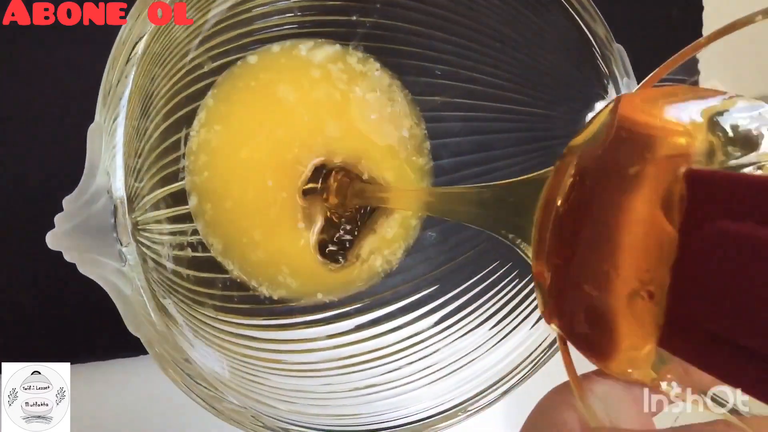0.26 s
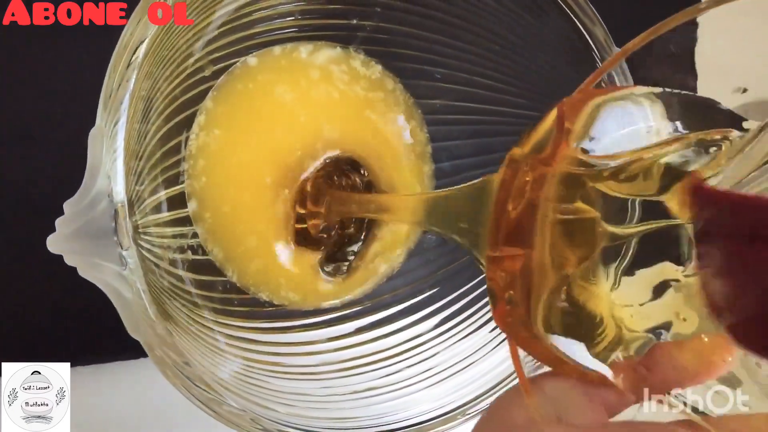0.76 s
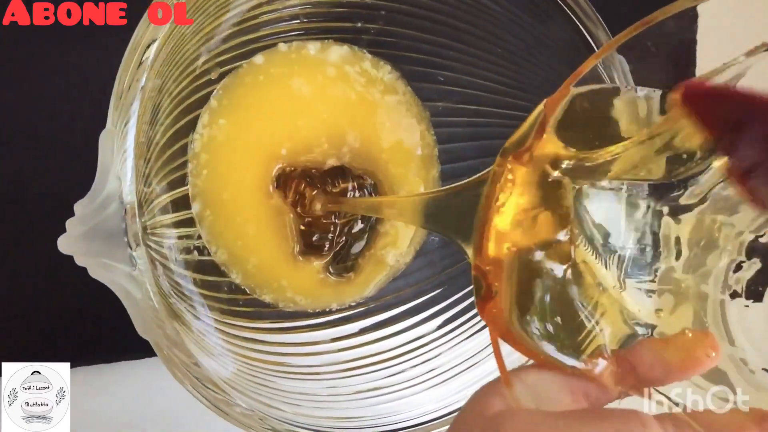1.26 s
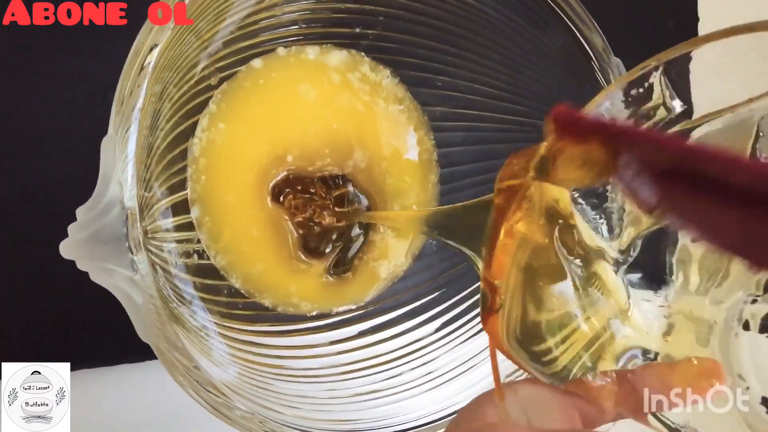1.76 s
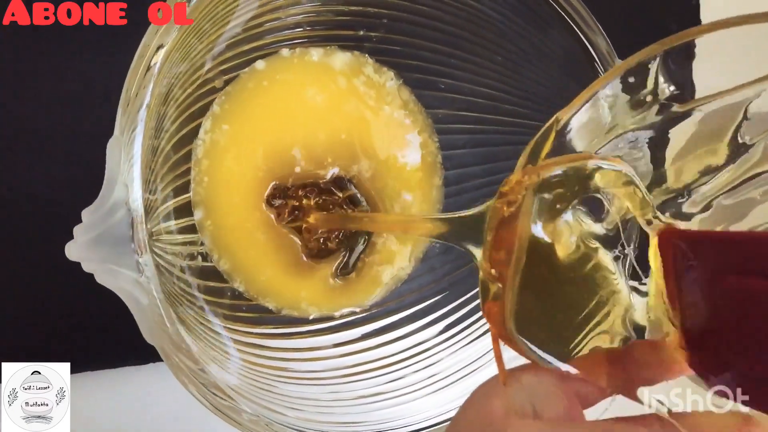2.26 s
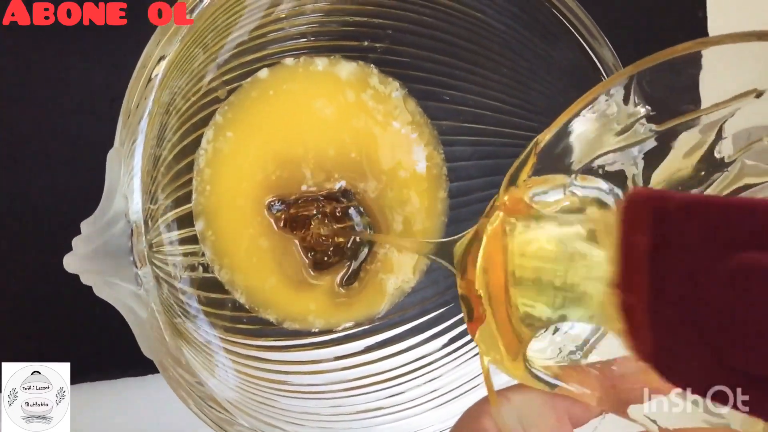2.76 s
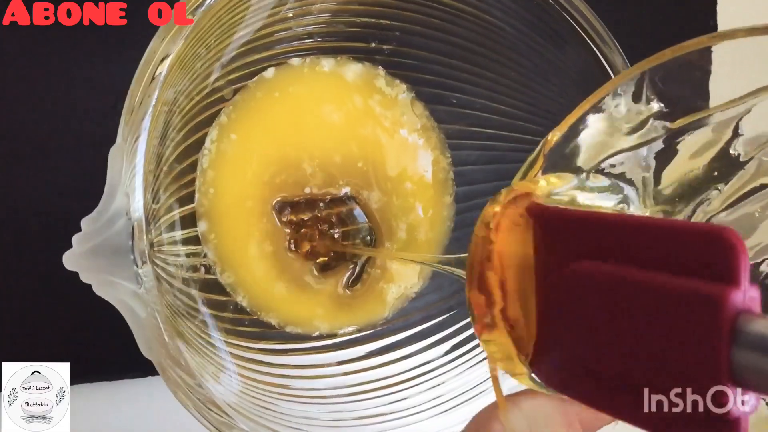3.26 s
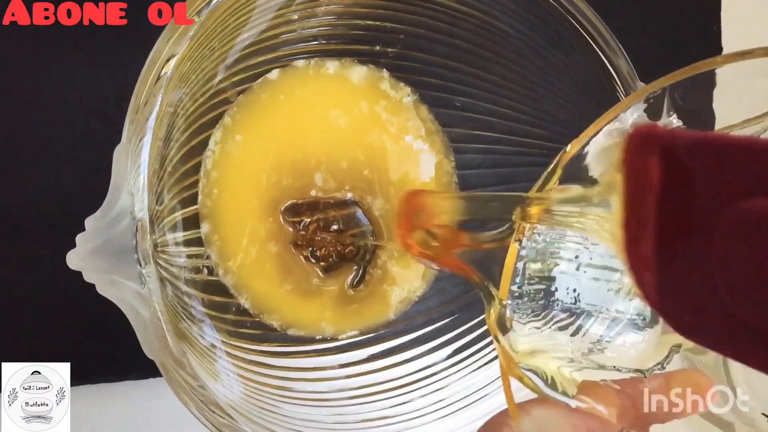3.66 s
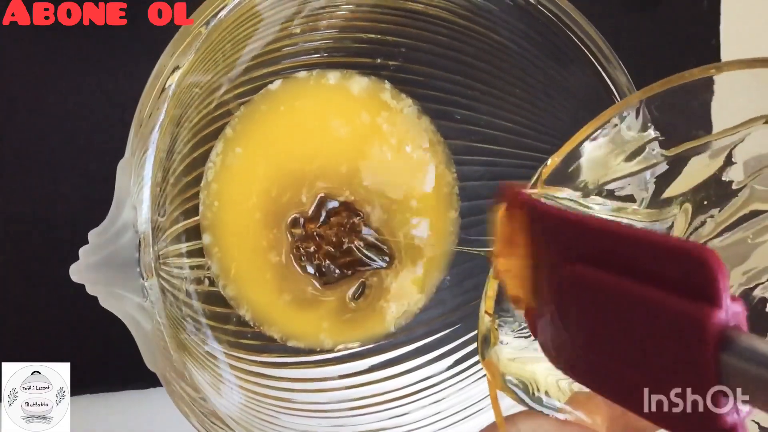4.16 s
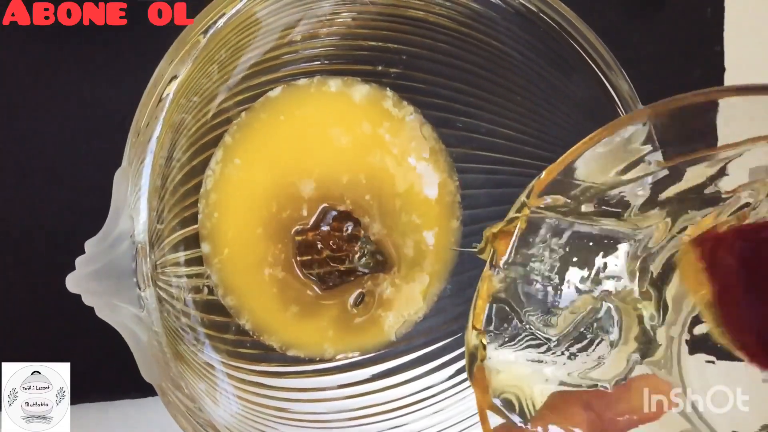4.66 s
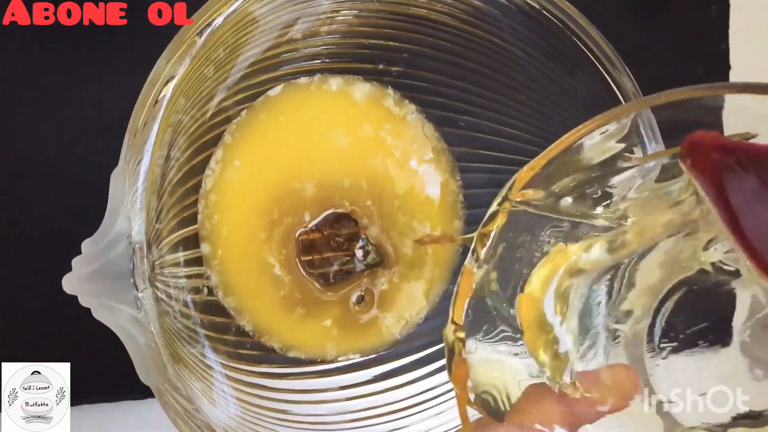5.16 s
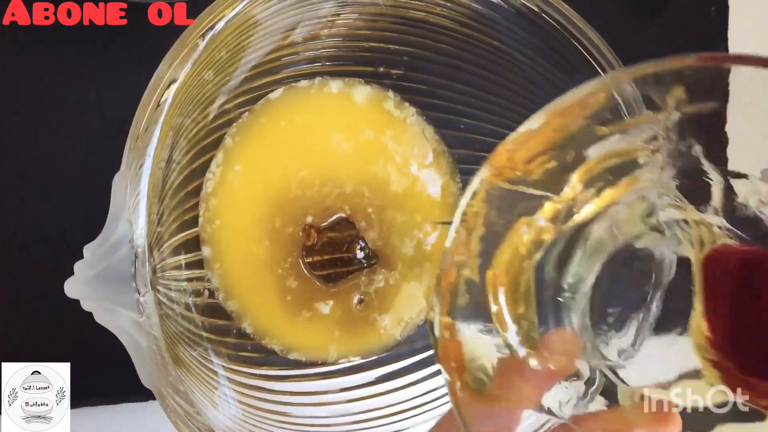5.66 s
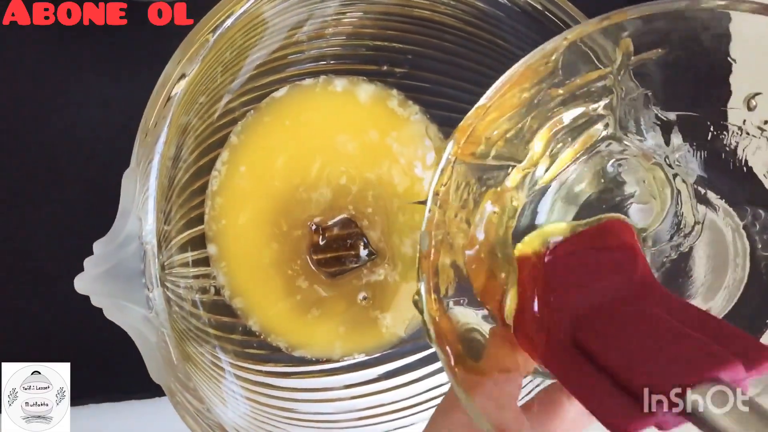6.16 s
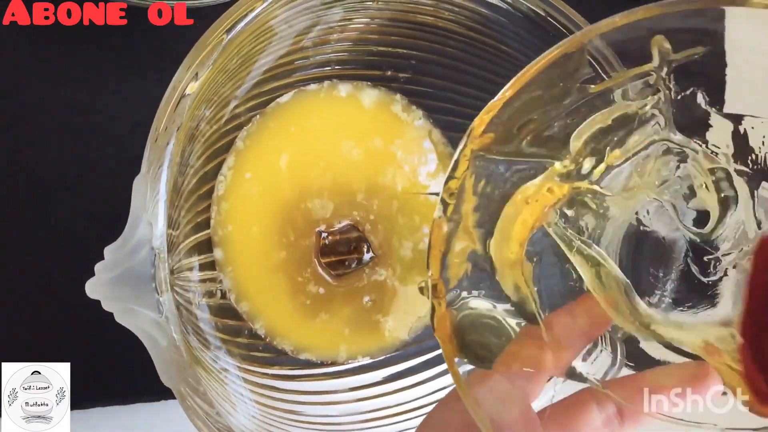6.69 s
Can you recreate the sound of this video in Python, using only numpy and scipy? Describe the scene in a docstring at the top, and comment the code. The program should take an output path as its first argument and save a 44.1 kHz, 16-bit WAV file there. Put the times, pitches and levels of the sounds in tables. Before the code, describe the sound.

In a quiet humming kitchen, two glass bowls clink sharply twice, then come sparse sticky ticks and one faint rubber spatula scrape on glass.

```python
"""Two glass bowls, damped by hands and syrup, knock rims hard twice and touch lightly a few times: ringing modes
and a noise crack. A rubber spatula scrapes the glass: one long stroke of squeak and rasp, and short dull rubs.
Sticky syrup film ticks and crackles: highpassed noise bursts and clicks. The table takes dull sine bumps.
An appliance hums behind it all in a kitchen whose echo is decaying noise."""
import sys
import numpy as np
from scipy import signal
from scipy.fft import rfft, irfft
from scipy.io import wavfile

SR = 44100
rng = np.random.default_rng(int(sys.argv[2]) if len(sys.argv) > 2 else 0)


def generate_wav(sig):
    """Save sig (samples, or channels by samples) to the path in sys.argv[1] as 16-bit PCM at SR."""
    pcm = np.round(np.clip(np.atleast_2d(sig).T, -1, 1) * 32767).astype(np.int16)
    wavfile.write(sys.argv[1], SR, pcm)


N = 305547


def from_db(db):
    """Decibels to amplitude."""
    return 10 ** (np.asarray(db) / 20)


def rms_one(x):
    """Scale to rms 1."""
    return x / np.sqrt(np.mean(x ** 2) + 1e-20)


def at_hz(points, hz):
    """Read a table on a log-frequency axis."""
    freqs, values = np.transpose(points)
    return np.interp(np.log(np.maximum(hz, 1)), np.log(freqs), values)


def noise(spectrum, size=N):
    """Noise of a given colour, rms 1."""
    hz = np.fft.rfftfreq(size, 1 / SR)
    white = rfft(rng.standard_normal(size))
    return rms_one(irfft(white * from_db(at_hz(spectrum, hz)), size))


def drift(knots_per_s):
    """Slow chance: straight lines between random knots of spread 1."""
    knots = rng.standard_normal(4000)
    return np.interp(np.arange(N) / SR * knots_per_s, np.arange(len(knots)), knots)


def cut(x, hz, kind, order=2):
    """Butterworth filter."""
    sos = signal.butter(order, np.clip(hz, 10, SR * .45), kind, fs=SR, output="sos")
    return signal.sosfilt(sos, x)


def dying(t, t60):
    """Falls by 60 dB in t60."""
    return np.exp(-np.log(1000) * t / t60)


def swell(t, rise, t60):
    """Rises evenly, then dies away."""
    return np.clip(t / rise, 0, 1) * dying(np.maximum(t - rise, 0), t60)


def add(out, s, sound):
    """Mix a sound in at time s."""
    start = max(0, round(s * SR))
    out[start:start + len(sound)] += sound[:N - start]


def bowls():
    """Each contact builds up the glass modes, mixed by where the rims meet, over a brief crack."""
    # glass meets glass: start_s, level_db, contact_s, rim_place (0-1), crack_db (relative to level)
    knocks = [(1.796, -41.5, .002, 0.77, -20), (2.2809, -5.5, .001, 0, -2), (2.2915, -13, .0035, 0.1, -3),
              (2.3035, -21, .004, 0, 6.5), (2.3105, -17.5, 0.0028, 0.2, 1.5), (2.9589, -1.5, .0008, 1, -1),
              (3.8442, -41.5, 0.0053, 0.6, 11), (5.753, -43, 0.0011, 0.55, -2),
              (5.767, -43, 0.003, 0.05, -3)]
    # modes of the two bowls, damped by hand and syrup: mode_hz, place_0_db, place_1_db, t60_s
    glass = [(222, -31, -29, .08), (302, -31, -31, .07), (600, -26, -19, .025), (680, -33, -30, .04),
             (957, -15, -9, .05), (969, -33, -28, .3), (1035, -19, -12, .05), (1142, -25, -20, .05),
             (1330, -33, -23, .025), (1622, -36, -24, .055), (1866, -13, -12, .06), (1903, -35, -30, .27),
             (2431, -24, -31, .06), (2672, -18, -11, .03), (2772, -28, -19, .03), (2868, -30, -24, .03),
             (3205, -26, -19, .06), (3298, -34, -35, .3), (3528, -25, -22, .03), (4403, -29, -40, .06),
             (4533, -27, -29, .05), (4985, -29, -34, .08), (5280, -30, -30, .05), (5510, -25, -27, .035),
             (6810, -24, -38, .035), (6957, -26, -27, .06), (7270, -34, -24, .05), (9200, -31, -33, .04),
             (11191, -28, -24, .055), (12200, -25, -20, .022)]
    # colour of the crowd of brief modes at the contact: freq_hz, relative_db
    crack_colour = [(100, -15), (220, -7.5), (450, -6.5), (750, -9), (1050, 1.5), (1500, 1.5), (2100, -7),
                    (2900, 0.5), (4000, -6.5), (6500, -12), (8000, -15), (10000, -13.5), (13000, -7),
                    (16000, -9)]
    crack_base_db, crack_t60_s = -.5, .017
    # lowpass of a knock at 0 dB; lighter ones are duller
    hard_knock_hz, db_per_octave_duller = 14500, 36.5

    out, t = np.zeros(N), np.arange(SR // 2) / SR
    hz, db_0, db_1, t60_s = np.transpose(glass)
    signs = (-1) ** np.arange(len(hz))  # neighbouring modes swing in opposite directions
    modes = np.sin(2 * np.pi * hz[:, None] * t) * dying(t, t60_s[:, None])
    for s, db, contact_s, place, crack_db in knocks:
        heights = signs * from_db(db_0 + place * (db_1 - db_0))
        ring = heights @ modes
        crack = noise(crack_colour, size=len(t)) * dying(t, crack_t60_s)
        crack = from_db(crack_base_db + crack_db) * crack
        pressed = np.minimum(t / contact_s, 1)  # the swing grows while the rims touch
        bright_hz = hard_knock_hz * 2 ** (db / db_per_octave_duller)
        add(out, s, from_db(db) * cut((ring + crack) * pressed, bright_hz, "low"))
    return out


def spatula():
    """Rubber judders over wet glass: a light blade gives a narrow whisper, a firm one a grainy rasp."""
    # resonances of the wall under the pressed blade: mode_hz, level_db, t60_s
    wall_modes = [(562, 0.5, 0.026), (2410, -7.5, 0.02), (3620, 0.5, 0.0078), (4220, 1.5, 0.011),
                  (5380, -1.5, 0.012), (6170, -4.5, .003), (8700, -7, 0.0032)]
    # short dull rubs at the rim: start_s, level_db, rise_s, t60_s
    rim_rubs = [(2.17, -63, .04, .5), (3.368, -49, .014, 0.19), (3.47, -70, 0.102, 0.45)]
    # colour of those rubs: freq_hz, relative_db
    rub_colour = [(200, -21), (400, 9.5), (600, -6), (1200, -5), (2000, -5.5), (3200, -15.5), (6000, -35),
                  (16000, -53.5)]
    reference_db, lifted_db = -60, -85
    squeak_db, squeak_growth, squeak_lowpass_hz = -7, .27, 200  # growth: dB per dB of force
    rasp_db, rasp_growth, slips_per_s = -1, 1.32, 1500
    grip_db, judder_db = 2.5, 3  # random spread

    press_db, squeak_hz = stroke(lifted_db)
    force_db = press_db - reference_db
    touching = np.clip((press_db - lifted_db) / 10, 0, 1)

    friction = rms_one(cut(rng.standard_normal(N), squeak_lowpass_hz, "low"))
    friction = friction * from_db(grip_db * drift(30))
    squeak = np.sqrt(2) * friction * np.sin(2 * np.pi * np.cumsum(squeak_hz) / SR)

    t = np.arange(SR // 20) / SR
    wall = sum(from_db(db) * rms_one(np.sin(2 * np.pi * hz * t) * dying(t, t60_s))
               for hz, db, t60_s in wall_modes)
    slips = (rng.random(N) < slips_per_s / SR) * rng.standard_normal(N)
    rasp = rms_one(signal.fftconvolve(slips, wall)[:N])

    sweep = from_db(squeak_db + squeak_growth * force_db) * squeak
    sweep = sweep + from_db(rasp_db + rasp_growth * force_db) * rasp
    rub_level = sum(from_db(db) * swell(np.arange(N) / SR - s, rise_s, t60_s)
                    for s, db, rise_s, t60_s in rim_rubs)
    rubs = noise(rub_colour) * rub_level
    return (from_db(reference_db) * touching * sweep + rubs) * from_db(judder_db * drift(150))


def stroke(lifted_db):
    """Pressure (dB) and sinking squeak pitch (Hz) of one stroke: press, ease, bear down again, lift."""
    start_s, attack_s, firm_s, ease_s, length_s, release_s = 5.146, .018, .049, .07, .63, .09
    firm_db, light_db = -53.5, -76
    end_press_db, end_press_s = 5.5, .12
    squeak_start_hz, sag_hz_per_s = 2460, 430

    t = np.arange(N) / SR - start_s
    pressed_db = light_db + (firm_db - light_db) * np.exp(-np.maximum(t - firm_s, 0) / ease_s)
    pressed_db = pressed_db + end_press_db * np.exp(-((t - length_s) / end_press_s) ** 2)
    contact = np.clip(t / attack_s, 0, 1) * np.clip(1 - (t - length_s) / release_s, 0, 1)
    press_db = lifted_db + contact * (pressed_db - lifted_db)
    return press_db, squeak_start_hz - sag_hz_per_s * np.clip(t, 0, length_s)


def ticks():
    """Threads and bubbles of syrup tear and snap, over a random crackle of tiny ones."""
    # larger snaps: start_s, peak_db, lower_edge_hz
    large_snaps = [(.875, -36, 9500), (.9673, -43.5, 9000), (1.4638, -32, 5000), (2.405, -42, 9000),
                   (2.4237, -40, 3950), (2.5064, -40, 6500), (3.8443, -22, 3500), (3.9716, -43, 9200),
                   (4.0036, -41.5, 9100), (4.3402, -47.5, 11000), (4.67, -46, 11000), (4.866, -35.5, 6000),
                   (4.947, -33.5, 7000), (4.961, -36, 5940), (5.0185, -32, 4600), (5.159, -39, 4000),
                   (5.3736, -35, 6150), (5.541, -43.5, 8000), (6.384, -28, 5500)]
    snap_t60_s = .005
    tear_db, tear_width_s, tear_grains_per_s = -1.5, .007, 900
    body_db, body_hz = -19, 1500
    crackle_db, spread_db, crackle_hz = -50, 5.5, 10000  # click level before the highpass
    crackle_per_s, spell_per_s = 3, 190
    spell_start_s, spell_length_s = 5.79, .23

    out, t = np.zeros(N), np.arange(-SR // 20, SR // 20) / SR
    for s, db, edge_hz in large_snaps:
        white, grains = rng.standard_normal((2, len(t)))
        grains = grains * (rng.random(len(t)) < tear_grains_per_s / SR)
        tear = grains * np.exp(-np.abs(t) / tear_width_s)  # fine grains before and after the snap
        burst = white * (t >= 0) * dying(np.abs(t), snap_t60_s) + from_db(tear_db) * tear
        body = from_db(body_db) * cut(burst, body_hz, "high", order=1)
        snap = cut(burst, edge_hz, "high") + body
        add(out, s + t[0], from_db(db) * snap / np.abs(snap).max())

    since_s = np.arange(N) / SR - spell_start_s
    in_spell = (since_s > 0) & (since_s < spell_length_s)
    per_s = np.where(in_spell, spell_per_s, crackle_per_s)
    clicks = (rng.random(N) < per_s / SR) * from_db(crackle_db + spread_db * rng.standard_normal(N))
    return out + cut(clicks + 1e-18, crackle_hz, "high")


def bumps():
    """The table top swings at its own low pitch; nudges of the blade give shorter, higher thuds."""
    # the hands shift their weight: start_s, level_db
    table_bumps = [(0.094, -40.5), (.375, -40.5), (1.548, -42.5), (2.182, -39), (3.707, -46.5),
                   (3.863, -40), (4.461, -40), (4.779, -42.5), (5.203, -43)]
    # the rubber blade nudges the bowl: start_s, level_db, pitch_hz
    blade_thuds = [(0.314, -44, 312), (1.8, -44.5, 225), (3.52, -44.5, 258), (3.846, -44, 261),
                   (3.859, -33, 124), (5.211, -44.5, 220), (5.665, -43.5, 284), (5.755, -48.5, 241)]
    table_hz, table_t60_s, table_rise_s = 61.17, .48, .014
    thud_t60_s, thud_rise_s = .14, .012

    out, t = np.zeros(N), np.arange(SR) / SR
    table_envelope = dying(t, table_t60_s) * (1 - np.exp(-t / table_rise_s))
    for s, db in table_bumps:
        add(out, s, from_db(db) * np.sin(2 * np.pi * table_hz * t) * table_envelope)
    thud_envelope = dying(t, thud_t60_s) * (1 - np.exp(-t / thud_rise_s))
    for s, db, hz in blade_thuds:
        add(out, s, from_db(db) * np.sin(2 * np.pi * hz * t) * thud_envelope)
    return out


def kitchen(x):
    """Diffuse echoes off counter and walls: banded noise, the treble generally dying sooner."""
    # echo colour: freq_hz, relative_db
    echo_colour = [(150, 0), (450, 1.5), (750, -3), (1150, 2.5), (1900, -1.5), (2700, -3.5), (3400, -2.5),
                   (5300, .5), (8000, 2.5), (13000, -4.5)]
    # echo decay: freq_hz, t60_s
    echo_t60 = [(150, 0.42), (1000, 0.36), (3200, 0.39), (7000, 0.18), (11000, .25), (16000, .19)]
    room_db, first_echo_s, build_s = -19, .013, .0051

    t = np.arange(SR * 2 // 3) / SR
    white, hz = rfft(rng.standard_normal(len(t))), np.fft.rfftfreq(len(t), 1 / SR)
    edges_hz, tail = np.geomspace(60, SR / 2, 25), 0
    for low, high in zip(edges_hz, edges_hz[1:]):
        centre_hz = np.sqrt(low * high)
        band = irfft(white * ((hz >= low) & (hz < high)), len(t))
        level = from_db(at_hz(echo_colour, centre_hz))
        tail = tail + level * band * dying(t, at_hz(echo_t60, centre_hz))
    tail = tail * np.clip((t - first_echo_s) / build_s, 0, 1)
    return from_db(room_db) * signal.fftconvolve(x, tail / np.linalg.norm(tail))[:N]


def background():
    """Room air, the wavering sine hum of an appliance and the low noise tremble of the table."""
    # air colour: freq_hz, relative_db
    air_colour = [(20, -22.5), (35, -16), (50, -7.5), (62, -0.5), (80, -4), (130, -3.5), (170, -6),
                  (230, -0.5), (330, -10.5), (450, -10), (1000, -16.5), (1500, -21.5), (5000, -29.5),
                  (16000, -36.5)]
    # appliance hum: pitch_hz, rms_db (before the waver)
    hum_tones = [(59.2, -68), (99, -73), (200, -72), (301.5, -73), (490, -80), (737.5, -80)]
    # table top trembling under the hands: freq_hz, relative_db
    tremble_colour = [(20, -49.5), (45, -18.5), (54, -3), (60, 0.5), (67, -4.5), (85, -18), (160, -30),
                      (1000, -78.5)]
    air_db, tremble_db = -62.5, -62  # rms
    waver, waver_knots_per_s, phase_wander_rad = .25, 7, .5

    t, hum = np.arange(N) / SR, np.zeros(N)
    for hz, db in hum_tones:
        level = from_db(db) * (1 + waver * drift(waver_knots_per_s))
        phase = 2 * np.pi * hz * t + phase_wander_rad * drift(waver_knots_per_s)
        hum += np.sqrt(2) * level * np.sin(phase)
    return from_db(air_db) * noise(air_colour) + hum + from_db(tremble_db) * noise(tremble_colour)


def scene():
    """Bowls, spatula and syrup echo in the kitchen; bumps and background stay dry."""
    near = bowls() + spatula() + ticks()
    return near + kitchen(near) + bumps() + background()


def record(dry):
    """The highest peaks are clipped, then a steep lowpass cuts the top."""
    cutoff_hz, ripple_db, stop_db = 16300, .1, 80
    lowpass = signal.ellip(10, ripple_db, stop_db, cutoff_hz, fs=SR, output="sos")
    return signal.sosfilt(lowpass, np.clip(dry, -.85, .85))


dry = scene()
out = record(dry)
generate_wav(out)
```